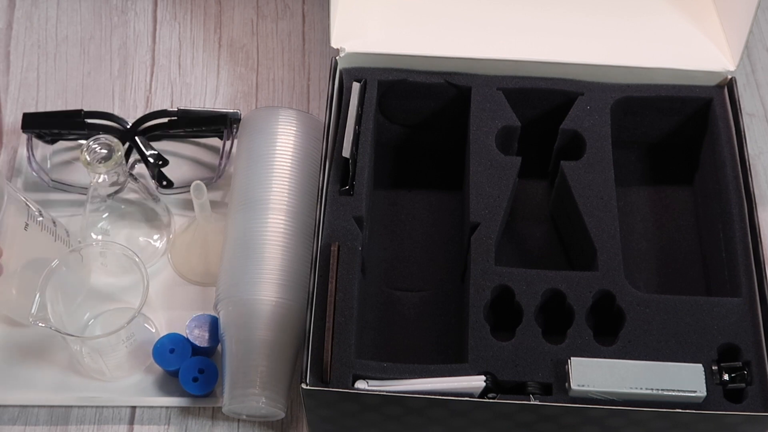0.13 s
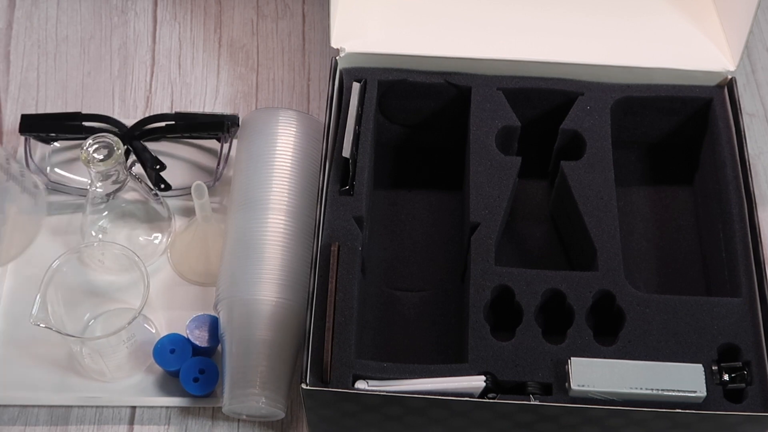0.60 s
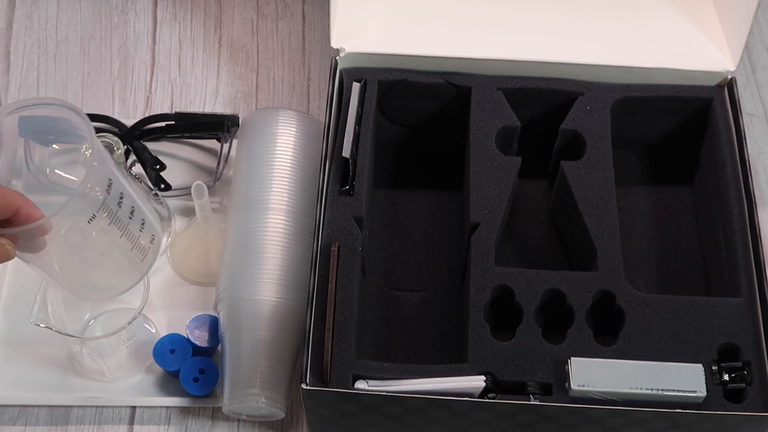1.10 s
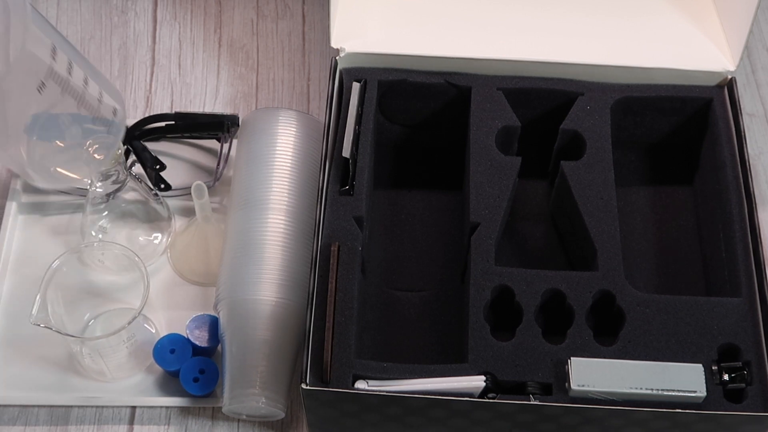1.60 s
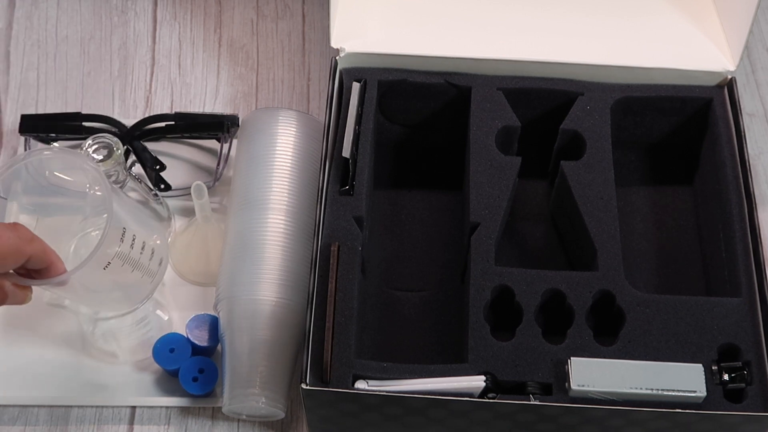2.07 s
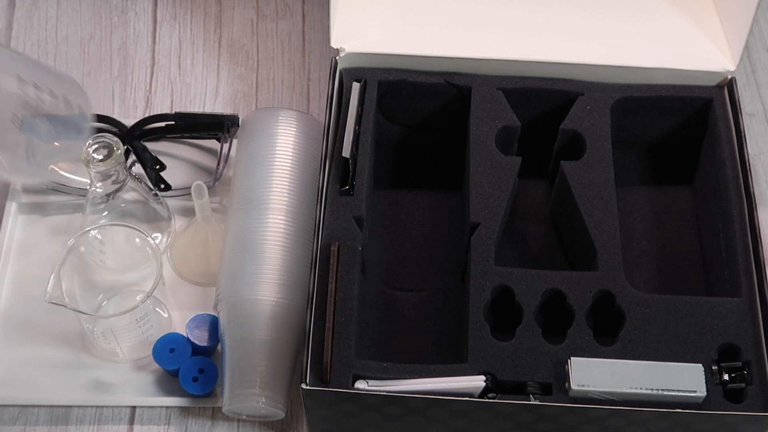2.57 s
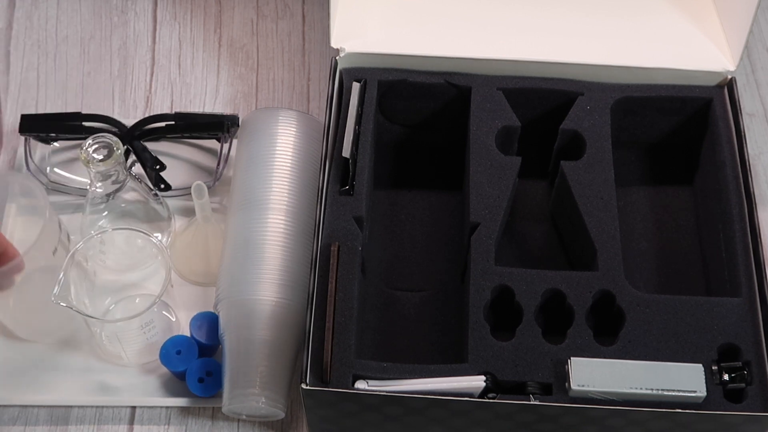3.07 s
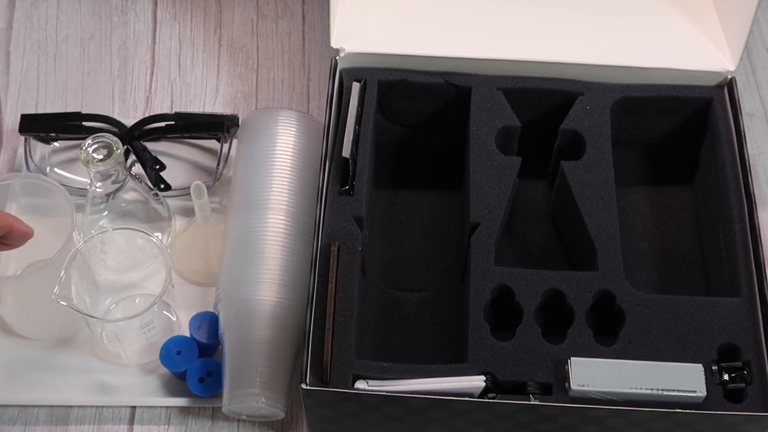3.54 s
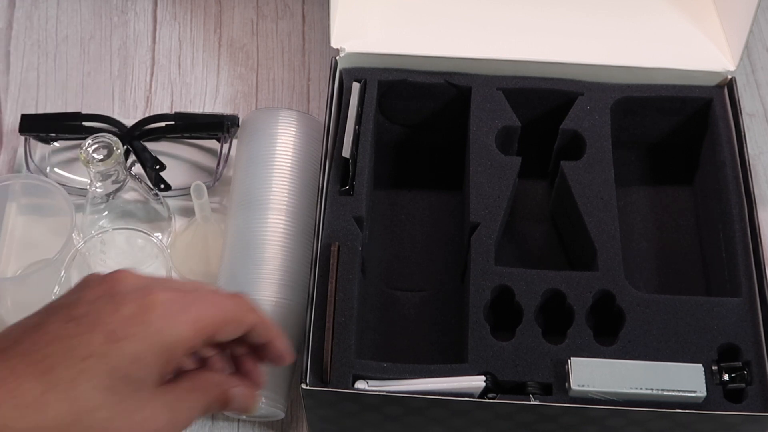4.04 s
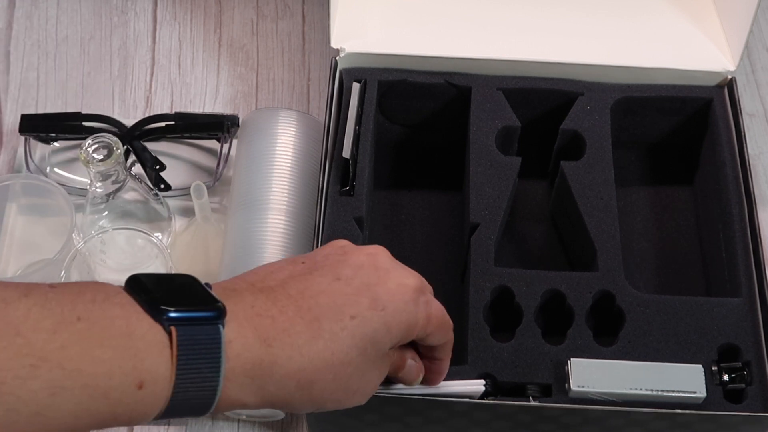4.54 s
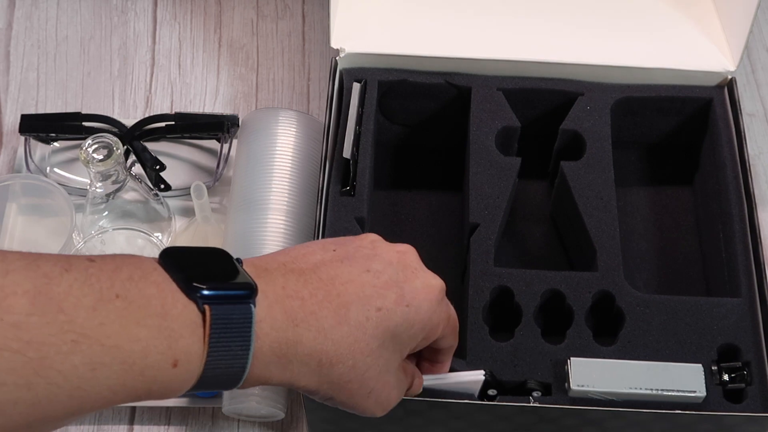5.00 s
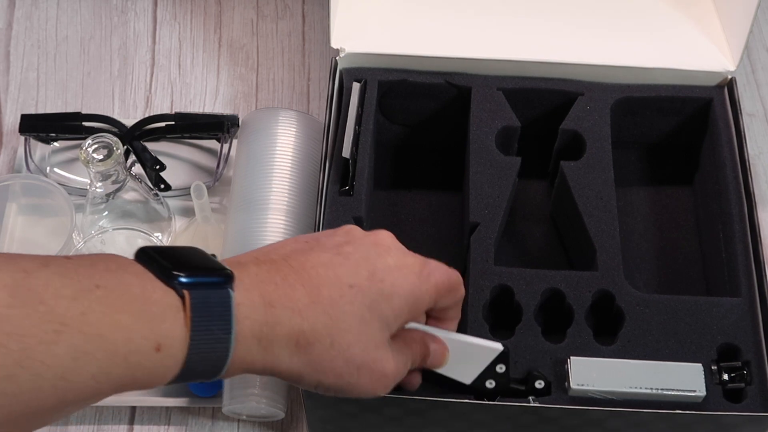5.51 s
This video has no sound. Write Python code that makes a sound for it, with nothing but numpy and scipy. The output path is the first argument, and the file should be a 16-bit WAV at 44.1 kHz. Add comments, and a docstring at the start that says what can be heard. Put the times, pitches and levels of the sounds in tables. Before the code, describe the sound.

Hollow plastic knocks with ringing glass in a hard-walled room, followed by soft rustling and a dull cardboard thump.

```python
"""Plastic cups, a plastic jug and glass vessels knock together on a tray in a quiet, hard-walled room: noise
cracks with damped sines for the dull plastic, a beating pair for the beaker, high partials for the flask.
Then a hand rustles, as swelling noise, over to a foam-lined cardboard case, which thumps and scuffs as a
small part is tugged out. Room air lies under it all; the close microphone's input saturates on loud blows."""
import sys
import numpy as np
from scipy import signal
from scipy.io import wavfile
from scipy.ndimage import uniform_filter1d, map_coordinates

SR = 44100
rng = np.random.default_rng(int(sys.argv[2]) if len(sys.argv) > 2 else 0)


def to_linear_factor(level_db):
    """Convert decibel levels (scalar or array-like) to linear amplitude factors."""
    exponent = np.asarray(level_db, float) / 20
    return 10 ** exponent


def master_out(mix):
    """Clip the mix to full scale and print it as 16-bit PCM to the path in sys.argv[1]."""
    frames = np.transpose(np.atleast_2d(mix))
    ceiling = np.clip(frames, -1, 1)
    pcm = np.round(ceiling * 32767).astype(np.int16)
    wavfile.write(sys.argv[1], SR, pcm)


N = 248221  # length [samples]


def along(points, hz):
    """Reads a (frequency, value) curve on a log frequency axis."""
    f, v = np.transpose(points)
    return np.interp(np.log(hz + 1), np.log(f + 1), v)


def unit(x):
    """Scales to rms 1."""
    return x / np.sqrt(np.mean(x ** 2) + 1e-20)


def wobble(rate):
    """A smooth random curve through normal random knots, rate knots a second."""
    knots = rng.standard_normal(int(N * rate / SR) + 4)
    return map_coordinates(knots, [np.arange(N) * rate / SR])


def hiss(spectrum, patchy_db):
    """Coloured noise of rms 1 with time-frequency patches of random gain."""
    hz, _, z = signal.stft(rng.standard_normal(N), SR, nperseg=1024)
    field = uniform_filter1d(rng.standard_normal(z.shape), size=10, axis=0)
    field = uniform_filter1d(field, size=4, axis=1)
    gain_db = along(spectrum, hz)[:, None] + patchy_db * unit(field)
    return unit(signal.istft(z * to_linear_factor(gain_db), nperseg=1024)[1][:N])


def swells(s, db, width, idle_db):
    """Bell-shaped swells over an idle level, added as powers."""
    t = np.arange(0, N + 64, 64) / SR
    power = to_linear_factor(2 * db)[:, None] * np.exp(-((t - s[:, None]) / width[:, None]) ** 2)
    level = np.sqrt(power.sum(axis=0) + to_linear_factor(2 * idle_db))
    return np.interp(np.arange(N) / SR, t, level)


def ring(modes, seconds, scatter_db, tilt_db=0, damping=1):
    """Damped sines; scatter gives each a new strength and sign, the tilt turns about the strongest mode."""
    t = np.arange(int(seconds * SR)) / SR
    hz, db, t60 = np.transpose(modes)[:, :, None]
    db = db + scatter_db * rng.standard_normal(db.shape) + tilt_db * np.log2(hz / hz[np.argmax(db)])
    sign = rng.choice([-1, 1], db.shape) if scatter_db else 1
    sines = sign * to_linear_factor(db - 60 * t * damping / t60) * np.sin(2 * np.pi * hz * t)
    onset = 1 - np.exp(-t / 0.00015)
    return np.sum(sines, axis=0) * onset


def burst(lo_hz, hi_hz, t60):
    """A puff of decaying noise, band-limited and scaled to peak 1."""
    t = np.arange(SR // 10) / SR
    band = signal.butter(2, np.clip([lo_hz, hi_hz], 50, 20000), 'bandpass', fs=SR, output='sos')
    puff = signal.sosfilt(band, rng.standard_normal(len(t)) * to_linear_factor(-60 * t / t60))
    return puff / np.abs(puff).max()


def add(track, s, sound, wet_db):
    """Lays a hit and its own room tail on the track; each frequency of the tail dies at its own speed."""
    # reverberation of the hard-walled room: (frequency [Hz], t60 [s])
    reverb = [(150, 0.26), (500, 0.46), (2000, 0.52), (5000, 0.41), (9000, 0.29), (15000, .15)]
    hz, t, z = signal.stft(rng.standard_normal(int(.7 * SR)), SR, nperseg=256)
    tail = signal.istft(z * to_linear_factor(-60 * t / along(reverb, hz)[:, None]), SR, nperseg=256)[1]
    delayed = np.pad(sound, (int(.005 * SR), 0))  # the room answers 5 ms late
    heard = to_linear_factor(wet_db) * signal.fftconvolve(delayed, tail / np.linalg.norm(tail))
    heard[:len(sound)] += sound
    part = track[round(s * SR):][:len(heard)]
    part += heard[:len(part)]


def without_bass(x, edge_hz):
    """Small bodies radiate little below their size."""
    return signal.sosfilt(signal.butter(3, edge_hz, 'highpass', fs=SR, output='sos'), x)


def contacts(events, body, crack_hz, crack_rise, tilt_db, tilt_rise, wet_db):
    """Each contact is a short crack, a thin treble tick and the dull ring of the struck body.

    Harder contacts are brighter: crack_rise is in octaves per dB of hardness, tilt_db in dB per octave,
    tilt_rise in dB per octave for each dB of hardness.
    """
    usual_hardness_db = -22
    track = np.zeros(N)
    for s, body_db, crack_db, hard_db in events:
        harder_db = hard_db - usual_hardness_db
        centre_hz = crack_hz * 2 ** (crack_rise * harder_db)
        tilt = tilt_db + tilt_rise * harder_db
        hit = to_linear_factor(body_db) * ring(body, seconds=.3, scatter_db=2.5, tilt_db=tilt)
        crack = burst(centre_hz / 1.96, centre_hz * 1.45, t60=0.033)
        tick = to_linear_factor(hard_db) * burst(lo_hz=4500, hi_hz=14400, t60=0.0065)
        hit[:len(crack)] += to_linear_factor(crack_db) * (crack + tick)
        add(track, s, hit, wet_db)
    return track


def air():
    """Steady room air as coloured noise, with faint sines that waver in level and phase."""
    # colour of the room air: (frequency [Hz], relative level [dB])
    air_colour = [(15, -44.5), (40, -23), (100, 4), (200, -8.5), (420, -12.5), (1040, -12), (1300, -16),
                  (3000, -17), (6000, -27), (13000, -33), (16200, -35)]
    # faint tones: (frequency [Hz], middle rms level [dB])
    whine = [(1035, -78), (1088, -81.5)]
    t = np.arange(N) / SR
    tones = np.zeros(N)
    for hz, db in whine:
        level = to_linear_factor(db + 4 * wobble(8.9)) * np.sqrt(2)
        tones += level * np.sin(2 * np.pi * hz * t + 1.5 * wobble(11))
    return to_linear_factor(-63.5) * hiss(air_colour, patchy_db=.5) + tones


def handling():
    """Cloth and skin rustle in smooth swells of noise; fingers scuff tray and cardboard in uneven slips."""
    # sleeve and skin strokes: (peak time [s], level [dB], half width [s], bright brushing over rustle [dB])
    strokes = [(0, -47.5, 0.043, -23), (.19, -50.5, .05, -10), (.55, -57, 0.17, -6),
               (0.759, -56, 0.068, -4.5), (.97, -60.5, 0.066, -10.5), (1.54, -61, 0.1, -7.5),
               (2.53, -61.5, .03, -1), (2.9, -60.5, 0.21, -11.5), (3.45, -57.5, 0.16, -24),
               (3.65, -54, 0.084, -9.5), (4.05, -55, 0.18, -7), (4.3, -48, 0.11, -4),
               (4.531, -48, 0.031, -21), (4.63, -54.5, .08, -15), (4.82, -64.5, 0.083, -7.5),
               (5.03, -58.5, 0.099, -8), (5.19, -57.5, 0.078, -13), (5.499, -52.5, 0.069, -8.5)]
    # finger scuffs: (peak time [s], level [dB], half width [s])
    scuffs = [(.08, -54.5, 0.067), (.29, -45, 0.078), (2.58, -68, 0.14), (3.4, -52, 0.18),
              (3.63, -62.5, 0.044), (4.219, -59.5, .12), (4.55, -56, 0.031), (4.7, -60, 0.13),
              (5.05, -61, .08), (5.19, -53, .045), (5.46, -53.5, 0.076), (5.62, -58.5, 0.042)]
    # colours of rustling, bright brushing and rubbing: (frequency [Hz], relative level [dB])
    rustle_colour = [(200, -34.5), (320, -9.5), (700, -1), (1400, 0), (3500, 0), (5000, -14), (9000, -22.5),
                     (16000, -35.5)]
    brush_colour = [(2000, -29.5), (3000, -4.5), (4600, 2.5), (6200, -6.5), (8000, -14.5), (16000, -30)]
    rub_colour = [(150, -28.5), (280, -2), (450, 0), (700, -2.5), (1300, -9.5), (3000, -42)]
    # hands are never quite still
    idle_rustle_db, idle_brush_db, idle_scuff_db = -69, -79.5, -72.5

    s, db, width, bright_db = np.transpose(strokes)
    rustle = swells(s, db, width, idle_rustle_db) * hiss(rustle_colour, patchy_db=1)
    brush = swells(s, db + bright_db, width, idle_brush_db) * hiss(brush_colour, patchy_db=1)
    scuff = swells(*np.transpose(scuffs), idle_scuff_db) * hiss(rub_colour, patchy_db=1)
    return to_linear_factor(0.72 * wobble(40)) * (rustle + brush) + to_linear_factor(3.3 * wobble(60)) * scuff


def cardboard_case():
    """Thumps on the case excite short, low-pitched cardboard modes under a soft crack."""
    # thumps: (time [s], body level [dB], crack level [dB], hardness: treble tick over crack [dB])
    thumps = [(4.5014, -42.5, -49, -11), (4.61, -18, -19.5, -45), (4.6703, -42, -43, -26),
              (4.7195, -46, -52, -14), (4.9302, -55, -54, 3), (4.9786, -63, -48, -5),
              (5.0985, -47.5, -56, -1), (5.1592, -45, -46, -23), (5.1736, -41, -46, -26),
              (5.1949, -44.5, -43, -26), (5.4746, -41, -44, 0), (5.4979, -46, -32, -9.5),
              (5.5279, -51, -51, -4)]
    # cardboard modes: (frequency [Hz], relative level [dB], t60 [s])
    cardboard = [(217, -15, 0.03), (297, -10.5, 0.025), (455, 1, 0.078), (543, -10.5, 0.051),
                 (689, -5.5, 0.062), (850, -10, 0.035), (1070, -10.5, 0.039), (1217, -8, 0.044),
                 (1550, -22, 0.023), (1670, -2.5, 0.028), (1974, -8, 0.06)]
    return contacts(thumps, cardboard, crack_hz=2094, crack_rise=.005, tilt_db=-3, tilt_rise=0.0454, wet_db=-4.5)


def flask():
    """High glass partials, muted by tray and fingers; they flutter as the glass chatters on its neighbours."""
    # blows: (time [s], neck level [dB], wall level [dB], wall tilt [dB per octave], damping by the grip [factor])
    clinks = [(.348, -22, -25, -2.5, 2.45), (2.063, -15.5, -30.5, 11.5, 1.4), (2.078, -20, -28.5, 0.5, 1.3),
              (2.487, -70.5, -66, 13, 1.7), (2.994, -35, -32.5, 3, 2.03), (3.013, -51.5, -42.5, 7, 2.2),
              (3.025, -49, -37, 6, 2.3), (3.05, -51.5, -32, -3, 3.8), (3.331, -56, -49, 2, 1.9)]
    # a cup rattles on the rim: (time [s], level [dB])
    pings = [(2.9945, -45), (3.0128, -39), (3.0247, -34), (3.033, -39)]
    # undamped glass modes of neck, wall and rim: (frequency [Hz], relative level [dB], t60 [s])
    neck_modes = [(3120, -6, 0.057), (3147, -1, 0.17), (3160, -8, 0.11)]
    wall_modes = [(4513, 1, 0.34), (4500, -5, 0.24), (4690, -11, .3), (4955, -16, .2), (5860, -14, 0.11),
                  (7780, -9.5, 0.21), (8440, -9, 0.14), (9000, -17, 0.16), (10370, -21.5, .1),
                  (12900, -22, .1)]
    rim_modes = [(2560, 10, .03), (11500, -1, 0.013), (14680, -11, .018)]

    track = np.zeros(N)
    for s, neck_db, wall_db, tilt_db, damping in clinks:
        neck = to_linear_factor(neck_db) * ring(neck_modes, seconds=.6, scatter_db=1, damping=damping)
        wall = to_linear_factor(wall_db) * ring(wall_modes, seconds=.6, scatter_db=2, tilt_db=tilt_db, damping=damping)
        add(track, s, neck + wall, wet_db=-4)
    track *= to_linear_factor(2.5 * wobble(45))  # chatter
    for s, db in pings:
        add(track, s, to_linear_factor(db) * ring(rim_modes, seconds=.05, scatter_db=1), wet_db=-12)
    return track


def beaker():
    """A slightly uneven glass rings with a beating pair of tones until the next blow chokes it."""
    # blows, shifted and damped by what touches the glass:
    # (time [s], lower tone level [dB], upper tone level [dB], lower tone t60 [s], shift of both tones [Hz])
    blows = [(0.347, -23.5, -21.5, 1.38, 1), (2.062, -12, -16, 0.41, 27.5), (2.105, -18, -10.5, 0.19, -9.5),
             (2.418, -49, -46, 0.24, 39.5), (2.995, -36, -20.5, 1.3, -17.5), (3.162, -40.5, -33, 1.06, -7)]
    low_hz, high_hz = 1693, 1746.2  # the lowest pair of the free glass
    # the ringing beaker is swung through a quiet spot of the room
    quiet_s, quiet_db, quiet_width_s = 0.682, -8, 0.069

    track = np.zeros(N)
    lasts = np.minimum(np.diff(np.transpose(blows)[0], append=N / SR), 1.5)
    for (s, low_db, high_db, t60, shift), seconds in zip(blows, lasts):
        tones = [(low_hz + shift, low_db, t60), (high_hz + shift, high_db, .8 * t60)]
        pair = ring(tones, seconds, scatter_db=0)
        add(track, s, pair, wet_db=-6.5 - 5.6 * t60)  # a long ring stands clear of the room
    t = np.arange(N) / SR
    return track * to_linear_factor(quiet_db * np.exp(-((t - quiet_s) / quiet_width_s) ** 2 / 2))


def jug():
    """The big plastic jug lands, bounces and settles: cracks over low, damped plastic modes."""
    # impacts: (time [s], body level [dB], crack level [dB], hardness: treble tick over crack [dB])
    landing = [(2.0624, -6, -6, -16), (2.0724, -7, 0.5, -19), (2.0844, -13.5, -1, -24),
               (2.4174, -46.5, -50, -17.5), (2.4834, -51.5, -47.5, -9.5)]
    # jug modes: (frequency [Hz], relative level [dB], t60 [s])
    jug_modes = [(483, -2, 0.13), (562, -0.5, 0.068), (650, -4.5, 0.078), (725.4, 2, 0.1),
                 (798, -2.5, 0.068), (914, -4, 0.043), (1010, -8, 0.043), (1193, -10.5, 0.032),
                 (1426, -13.5, .04)]
    return contacts(landing, jug_modes, crack_hz=2431, crack_rise=.001, tilt_db=-1, tilt_rise=0.7, wet_db=-7.5)


def cups():
    """Light plastic cups knock on the tray; their thin walls ring dully and briefly."""
    # knocks: (time [s], body level [dB], crack level [dB], hardness: treble tick over crack [dB])
    knocks = [(0.0024, -41.5, -41, -22), (0.0687, -42, -23, -36), (0.1535, -42, -40, -14),
              (0.1706, -34, -21.5, -25), (0.1793, -23.5, -14.5, -34), (0.2299, -34, -25, -36.5),
              (0.2857, -22, -16.5, -36), (0.3091, -25.5, -40, -20.5), (0.3485, -17.5, -18.5, -11.5),
              (0.3694, -16.5, -32, -14.5), (2.9941, -12.5, -13.5, -29), (3.0124, -16, -19.5, -20),
              (3.024, -21.5, -23, -14), (3.0327, -15, -20, -17), (3.0424, -15, -22, -20.5),
              (3.0504, -31, -27.5, -16), (3.0706, -40, -37, -11), (3.1616, -18.5, -8.5, -16.5),
              (3.1714, -31, -17.5, -13.5), (3.2044, -20.5, -28, -23), (3.2274, -30, -43, -11),
              (3.33, -40.5, -25, -11.5), (3.4373, -47, -42, -26), (3.4441, -40.5, -30.5, -27),
              (3.4704, -41, -38.5, -28), (3.5269, -42.5, -38, -34), (3.5544, -45, -45, -16.5),
              (3.5964, -45.5, -41, -10)]
    # cup modes: (frequency [Hz], relative level [dB], t60 [s])
    cup_modes = [(588, -9, 0.029), (673, -8.5, 0.085), (757.6, 0, 0.056), (835, -7, 0.064),
                 (950, -8.5, 0.036), (1056, -8.5, 0.072), (1132, -9.5, 0.065), (1245, -4.5, 0.019),
                 (1410, -6.5, 0.012)]
    return contacts(knocks, cup_modes, crack_hz=2400, crack_rise=0.014, tilt_db=1.3, tilt_rise=0.89, wet_db=-7.0)


def scene():
    """All sources at the one microphone."""
    vessels = without_bass(cups() + jug() + beaker() + flask(), edge_hz=272)
    case = without_bass(cardboard_case(), edge_hz=193)
    return (vessels + case + handling() + air())[None]


def band_limit(x):
    """A steep low-pass at the top of the band."""
    return signal.sosfilt(signal.butter(12, 16320, fs=SR, output="sos"), x)


def record(dry):
    """The input stage saturates close to full scale, with a slightly rounded knee."""
    clipped = dry / (1 + np.abs(dry / 1.03) ** 5) ** (1 / 5)
    return band_limit(clipped)


dry = scene()
out = record(dry)
master_out(out)
```